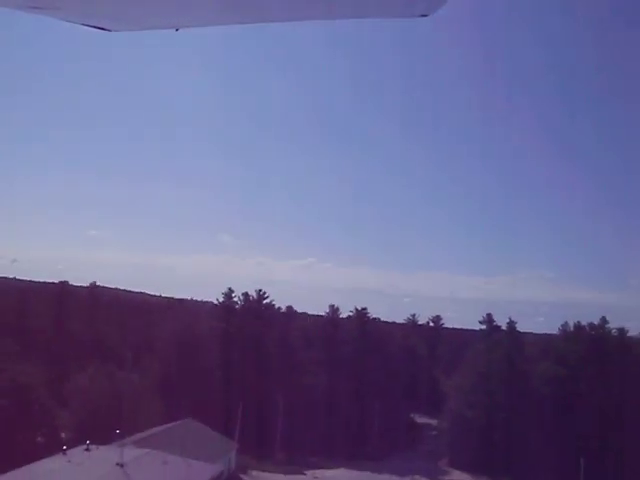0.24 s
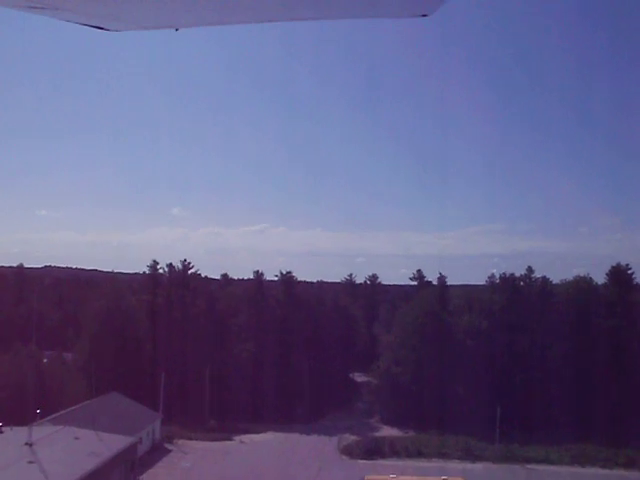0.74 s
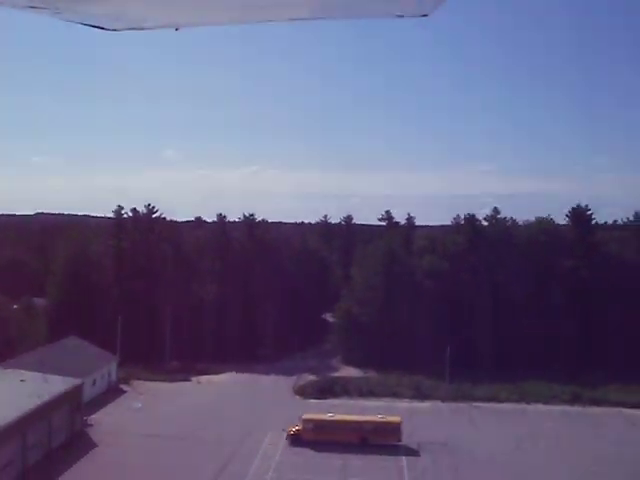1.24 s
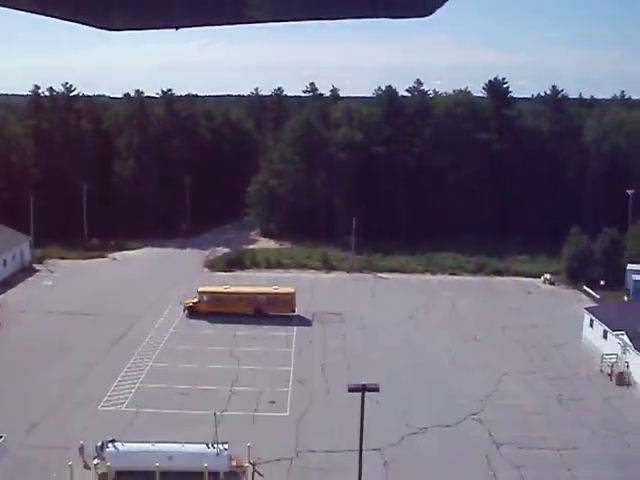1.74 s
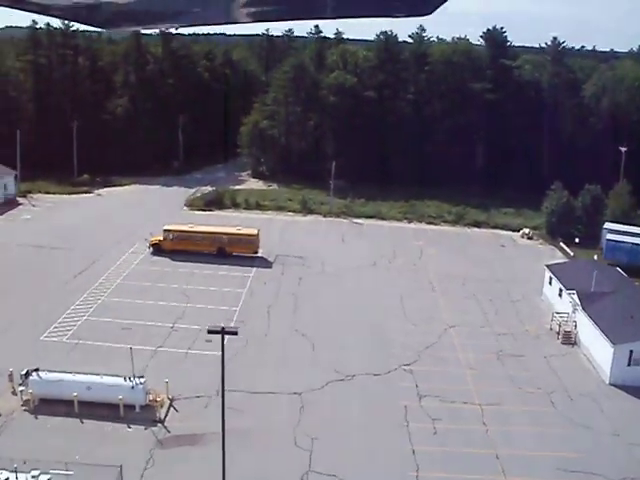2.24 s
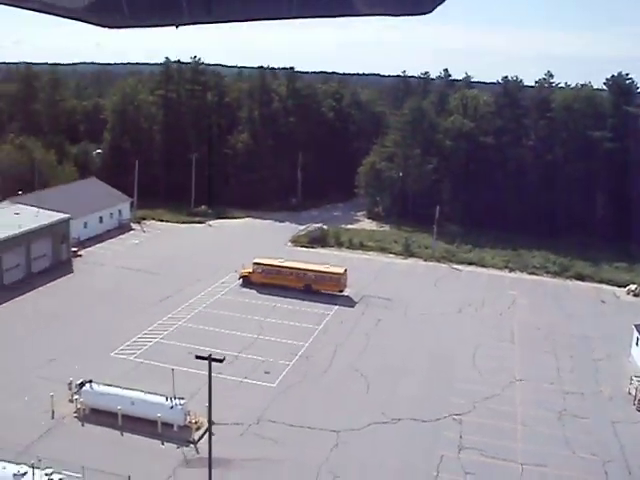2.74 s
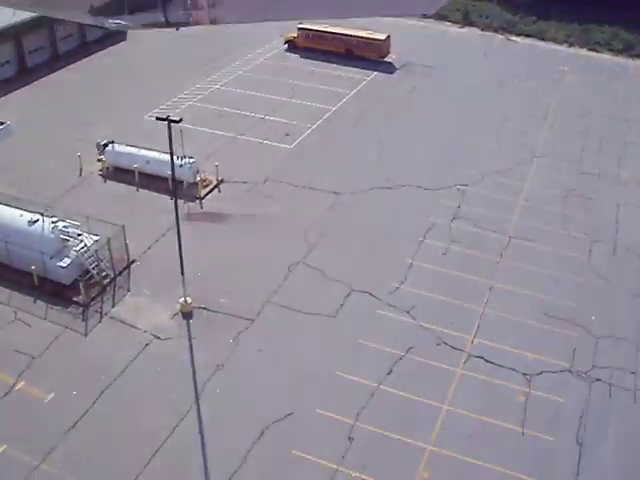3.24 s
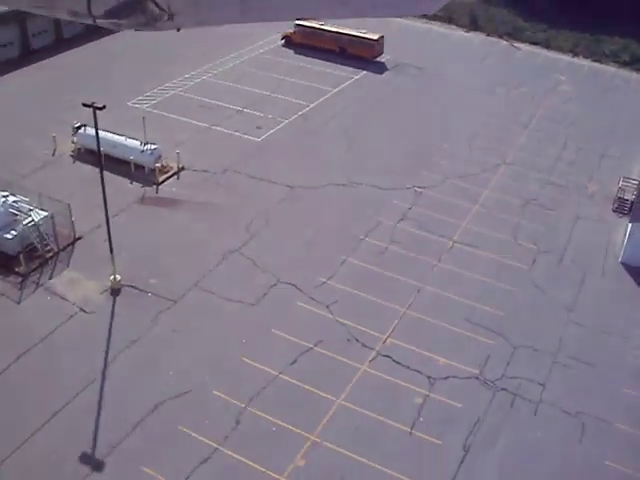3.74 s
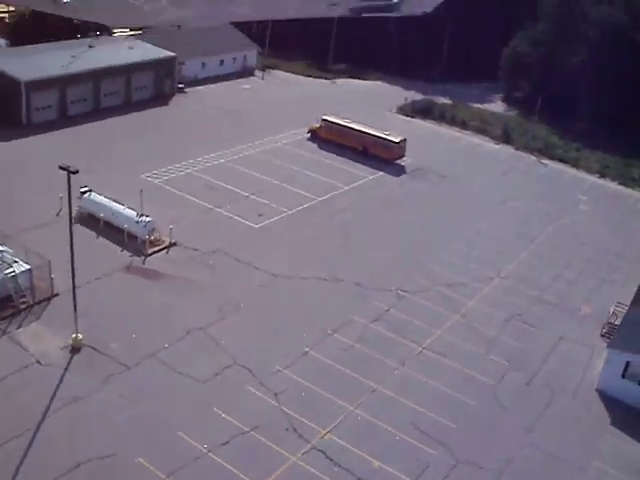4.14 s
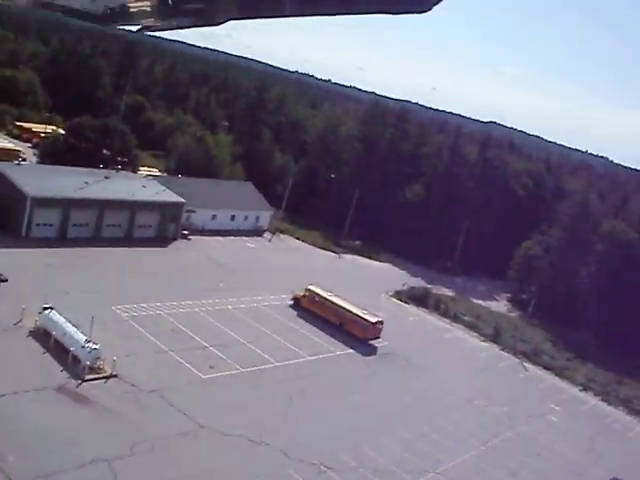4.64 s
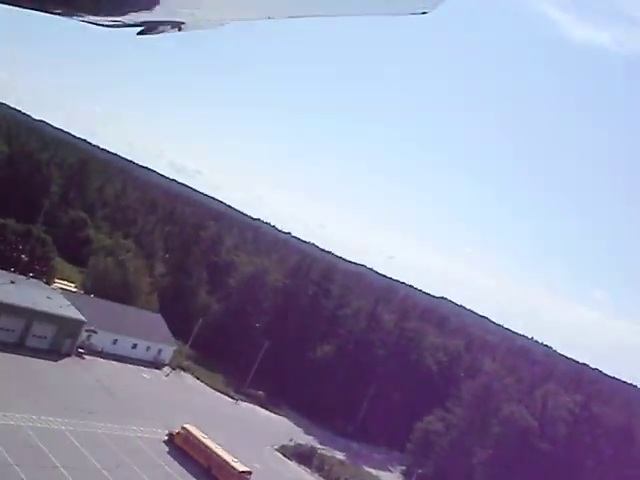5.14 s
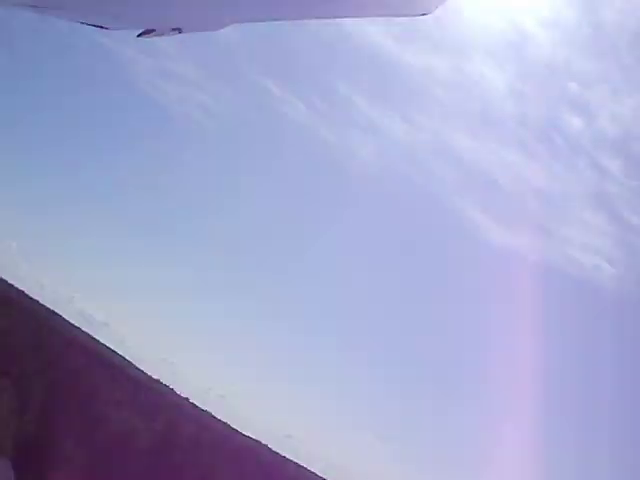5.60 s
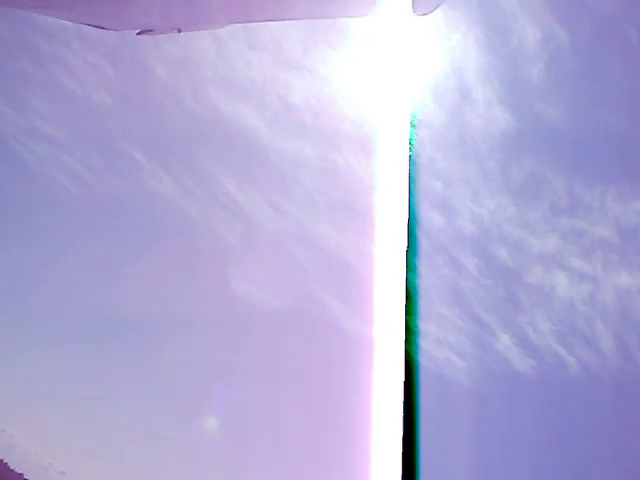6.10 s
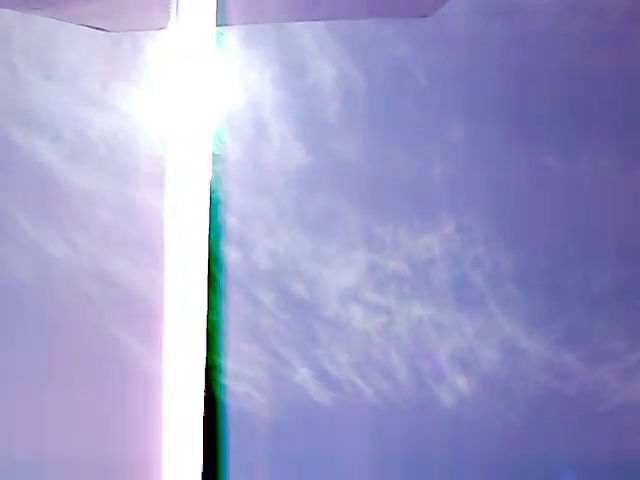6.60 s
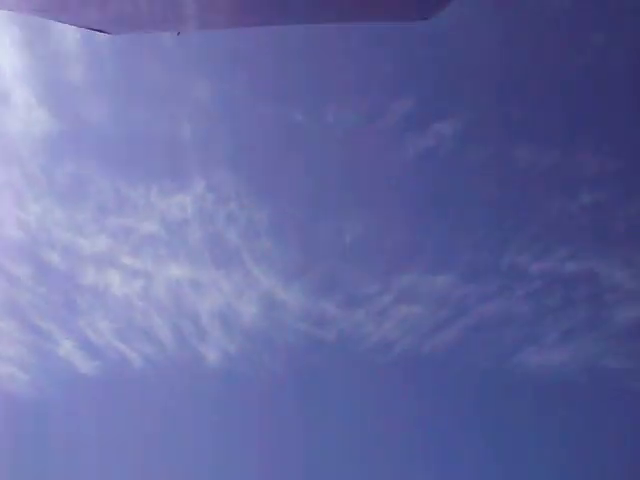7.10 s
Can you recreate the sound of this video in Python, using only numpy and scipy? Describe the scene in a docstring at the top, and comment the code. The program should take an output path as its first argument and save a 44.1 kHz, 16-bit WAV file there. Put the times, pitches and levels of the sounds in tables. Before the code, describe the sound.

Wind batters the small microphone from the first moment, overloading on gusts, while a high-revving little electric motor whines and buzzes at almost constant pitch. The airflow surges and slackens, strongest around the start of the banking climb. The whine's upper octave swells there, then pitch sags slightly, the motor tone changes and wash hiss rises. Dry, close, gritty and narrow.

```python
"""A small camera rides on an electric model glider that swoops over a car park and banks up into the sky.
From the start air noise thumps and rushes at the microphone, with short puffs, as the motor whines and the
propeller wash hisses. The air is strongest late in the dive and early in the bank, where the whine's octave swells.
Then the motor is eased back, its tones shift in balance, and the hiss rises and then stays strong to the end.
Air is shaped random noise, the motor is a sum of cosines, and the camera clips and keeps a narrow band."""
import sys
import numpy as np
from scipy import signal
from scipy.fft import rfft, irfft
from scipy.io import wavfile
from scipy.ndimage import uniform_filter1d

SR = 44100
rng = np.random.default_rng(int(sys.argv[2]) if len(sys.argv) > 2 else 0)


def dump(signal):
    """Clip the signal to [-1, 1] and save it as 16-bit WAV at the path in sys.argv[1]."""
    limited = np.clip(np.atleast_2d(signal).T, -1, 1)
    pcm = np.round(limited * 32767).astype(np.int16)
    wavfile.write(sys.argv[1], SR, pcm)


N = 324576
TIME_S = np.arange(N) / SR

# stages of the flight: (start, onset, hold, release), all in seconds
DIVE = (1.3, .7, 2.45, .65)
BANK = (4.2, 1.1, .5, .5)
THROTTLE_BACK = (5.95, .65, 1.0, .1)


def wind(airflow_db, eddies):
    """Large eddies thump on the microphone port, small ones rush round the camera case."""
    # gusts on the port: (time [s], swell of the rumble [dB], swell of the buffeting [dB])
    gusts = [(.18, 3.5, .5), (.74, 5.5, -1), (1.3, 3, 0), (1.75, 4, 0), (2.17, -1, 2.5), (2.45, 7, 1),
             (3.25, 2.5, 0), (3.72, 6, -1.5), (4.45, 4, 0), (5.13, 4.5, 0), (5.98, 2.5, .5), (6.55, 2, -1),
             (7.33, 3.5, 0)]
    # tone colours of the three air noises: (frequency [Hz], relative level [dB])
    rumble_colour = [(18, -14), (45, -5.5), (75, 1), (100, 0.5), (130, -6.5), (200, -21)]
    buffet_colour = [(80, -11), (125, -1), (170, 1.5), (240, -1), (400, -6.5), (650, -16.5), (1200, -29.5)]
    rush_colour = [(200, -11.5), (400, -2), (600, -3), (950, -6), (1400, -14), (2500, -20), (4000, -27.5)]
    gust_spread_s = .07
    eddy_db = 1.6

    # each pair: dB at zero airflow_db, then dB gained per dB of airflow
    rumble_db = air_level((-20, .3), airflow_db)
    buffet_db = air_level((-14.2, 1.1), airflow_db)
    rush_db = air_level((-23.5, .5), airflow_db)
    for moment_s, rumble_swell_db, buffet_swell_db in gusts:
        gust = swell(moment_s, gust_spread_s)
        rumble_db = rumble_db + rumble_swell_db * gust
        buffet_db = buffet_db + buffet_swell_db * gust

    # buffeting and rush share the same slower unevenness and the same quick eddies
    lumps_db = .7 * drift(9)
    buffet_db = buffet_db + lumps_db + .5 * eddy_db * eddies
    rush_db = rush_db + lumps_db + eddy_db * eddies
    rumble = from_db(rumble_db) * turbulence(rumble_colour, flutter_db=0.3, flutter_hz=6)
    buffet = from_db(buffet_db) * turbulence(buffet_colour, flutter_db=0.5, flutter_hz=30)
    rush = from_db(rush_db) * turbulence(rush_colour, flutter_db=1.5, flutter_hz=51)

    # the small eddies ride on the large ones
    large_eddies = rumble + buffet
    return large_eddies + rush * from_db(1.5 * rms_one(large_eddies))


def puffs(spread_s=0.0023):
    """Now and then an eddy bursts right on the port, short and bright."""
    # sharp puffs on the microphone port: (time [s], strength at the middle [dB])
    puff_moments = [(.153, -20), (.231, -16), (.372, -18), (.444, -18), (.548, -10), (.585, -14),
                    (.842, -17), (1.19, -19), (2.122, -16), (3.944, -15), (3.981, -15), (4.025, -13),
                    (4.492, -11), (4.758, -17), (5.068, -17), (5.521, -16), (5.863, -17), (6.109, -14),
                    (6.593, -19)]
    # tone colour of a puff: (frequency [Hz], relative level [dB])
    puff_colour = [(300, -3), (700, 0), (1500, -5), (3800, -11)]
    strength = sum(from_db(level_db) * swell(moment_s, spread_s) for moment_s, level_db in puff_moments)
    return strength * turbulence(puff_colour, flutter_db=2.5, flutter_hz=46)


def motor(turns, airflow_db):
    """The rotor runs off centre, so its tones bunch into short rising bursts, once per turn."""
    # motor and propeller tones before the swells below; 2 is the blade rate, 11-13 the whine:
    # (multiple of shaft speed, level at cruise [dB], level eased back [dB])
    tones = [(1, -28, -26), (2, -22, -28), (7, -42, -28), (10, -43, -42), (11, -32, -31), (12, -32, -42),
             (13, -25, -27), (14, -43, -48), (15, -46, -45), (16, -48, -44), (17, -42, -31.5),
             (18, -44, -55), (19, -42, -44), (20, -48, -50), (21, -45, -45), (22, -42, -48), (23, -41, -39),
             (24, -37, -45), (25, -40, -47), (26, -34, -39), (27, -36, -40), (28, -39, -36), (29, -47, -44),
             (30, -51, -43), (31, -50, -39), (32, -47, -44), (33, -44, -44), (34, -43, -43), (35, -45, -48),
             (36, -46, -47), (37, -45, -38), (38, -44, -45), (39, -48, -44), (40, -52, -54), (42, -43, -48)]
    # the tones gather round these multiples of the shaft speed; some lie on a cluster's lower flank
    clusters = (12, 25, 35)
    lower_flanks = (11, 12, 22, 23, 24, 25, 33, 34, 35)
    waver_db, wander_rad, sweep_rad = 1.6, .25, .2
    eased, bank = stage(THROTTLE_BACK), stage(BANK)

    # whine and buzz sink in fast air and swell under the load of the bank
    whine_db = -.9 - .5 * airflow_db + 2.8 * bank
    octave_db = -4.0 - .5 * airflow_db + 10.8 * bank
    buzz_db = -.3 - .3 * airflow_db + 1.3 * bank
    flank_db = 1.6 - 4.0 * stage(DIVE) - .4 * airflow_db
    # the blades beat and rasp harder in fast air
    beat_db = air_level((-.4, 1.1), airflow_db)
    rasp_db = air_level((0.2, .7), airflow_db)

    family_db = {}
    family_db.update(dict.fromkeys((1, 2), beat_db))
    family_db.update(dict.fromkeys((11, 12, 13), whine_db))
    family_db.update(dict.fromkeys(range(14, 21), rasp_db))
    family_db.update(dict.fromkeys(range(21, 40), buzz_db))
    family_db[26] = octave_db  # one octave above tone 13

    out = np.zeros(N)
    for multiple, cruise_db, eased_db in tones:
        # strong tones hold steadier, weak ones come and go
        looseness = np.interp(max(cruise_db, eased_db), [-38, -26], [1, .25])
        change_db = family_db.get(multiple, 0) + looseness * waver_db * drift(0.96)
        if multiple in lower_flanks:
            change_db = change_db + flank_db
        level = (1 - eased) * from_db(cruise_db) + eased * from_db(eased_db)
        level = level * from_db(change_db)
        # within each cluster the higher tones come later in the turn
        lag = sweep_rad * min(abs(multiple - centre) for centre in clusters) ** 2
        # the flexing airframe shifts each tone a little
        flex = looseness * wander_rad * drift(0.93)
        out += np.sqrt(2) * level * np.cos(2 * np.pi * multiple * turns - lag + flex)
    return out


def slipstream(turns, airflow_db, eddies, throb_db=0.4, eddy_db=0.23):
    """Propeller wash hisses, swelling once a turn and with each eddy."""
    # tone colour of the hiss: (frequency [Hz], relative level [dB])
    hiss_colour = [(700, -18), (1400, 1), (2000, 1), (2700, 0), (3400, -3), (3800, -1), (4000, -4.5)]
    # brief changes in the hiss: (time [s], level change [dB])
    hiss_lulls = [(.84, -4.2), (5.8, -2.8)]
    lull_spread_s = .17
    eased_rise_db = 3.5  # it hisses more with the throttle back
    lull_db = sum(change_db * swell(moment_s, lull_spread_s) for moment_s, change_db in hiss_lulls)
    hiss_db = air_level((-28.5, .45), airflow_db) + eased_rise_db * stage(THROTTLE_BACK) + lull_db
    swell_db = throb_db * np.cos(2 * np.pi * turns) + eddy_db * eddies
    return from_db(hiss_db + swell_db) * turbulence(hiss_colour, flutter_db=0.4, flutter_hz=4)


def turbulence(colour, flutter_db, flutter_hz):
    """Coloured air noise whose strength flutters as eddies pass."""
    hz, level_db = np.transpose(colour)
    bins_hz = np.maximum(np.fft.rfftfreq(N, 1 / SR), 1)
    # beyond both ends of the colour table the noise falls by 18 dB per octave
    octaves_below = np.maximum(np.log2(hz[0] / bins_hz), 0)
    octaves_above = np.maximum(np.log2(bins_hz / hz[-1]), 0)
    skirts_db = -18 * (octaves_below + octaves_above)
    shape = from_db(np.interp(np.log(bins_hz), np.log(hz), level_db) + skirts_db)
    noise = irfft(rfft(rng.standard_normal(N)) * shape, N)
    # a steady flow has a steady mean power
    mean_power = uniform_filter1d(noise ** 2, size=SR // 5)
    steady = noise / np.sqrt(mean_power)
    return rms_one(steady * from_db(flutter_db * drift(flutter_hz)))


def air_level(law, airflow_db):
    """Level in dB of a noise that grows with the airflow."""
    level_db, growth = law
    return level_db + growth * airflow_db


def stage(timing):
    """A stage of the flight comes on, holds and lets go: 0 to 1 and back."""
    start, onset, hold, release = timing
    corners_s = start + np.cumsum([0, onset, hold, release])
    return np.interp(TIME_S, corners_s, [0, 1, 1, 0])


def swell(moment_s, spread_s):
    """A bell curve of height 1 round a moment."""
    return np.exp(-.5 * ((TIME_S - moment_s) / spread_s) ** 2)


def drift(rate_hz):
    """Smoothed random wandering with a spread of 1; a higher rate wanders faster."""
    step = 100  # samples between the random points
    r = np.exp(-2 * np.pi * step * rate_hz / SR)
    points = rng.standard_normal(N // step + 2002)
    slow = signal.lfilter([1], [1, -2 * r, r * r], points)[2000:]  # drop the filter's run-in
    return np.interp(np.arange(N) / step, np.arange(len(slow)), rms_one(slow))


def in_time(rows):
    """Draw straight lines between the points of a curve, sample by sample."""
    seconds, values = np.transpose(rows)
    return np.interp(TIME_S, seconds, values)


def from_db(db):
    """Decibels to gain."""
    return 10 ** (np.asarray(db) / 20)


def rms_one(x):
    """Scale to an average strength (rms) of 1."""
    return x / np.sqrt(np.mean(x ** 2) + 1e-20)


def scene(motor_db=0.42):
    """Wind, propeller wash and motor, all close to the one microphone."""
    # motor speed: (time [s], speed [turns per s])
    shaft_curve = [(0.0, 92.01), (0.68, 92.47), (1.0, 92.2), (1.76, 93.44), (2.08, 92.69), (2.4, 92.4),
                   (2.8, 93.39), (3.2, 92.9), (3.64, 92.6), (4.48, 92.78), (5.0, 92.51), (5.12, 91.74),
                   (5.24, 90.37), (5.8, 89.62), (5.92, 89.94), (6.04, 91.1), (6.84, 90.98), (7.36, 91.29)]
    # strength of the airflow over the camera: (time [s], level [dB])
    airflow_curve = [(0.0, -0.8), (0.64, 0), (1.04, -3), (1.96, 0.5), (2.08, 2.5), (2.48, 2.5), (3.16, -3),
                     (3.52, 1.4), (3.8, 0), (3.96, 3.5), (5.0, 3), (5.24, 0.4), (5.76, 1.5), (6.36, -2.5),
                     (6.72, -1.7), (7.36, -2.1)]
    airflow_db = in_time(airflow_curve)
    # the speed wavers very slightly; adding it up counts the turns made so far
    speed = in_time(shaft_curve) * (1 + .0002 * drift(8))
    turns = np.cumsum(speed) / SR
    eddies = drift(35)
    air = wind(airflow_db, eddies) + puffs() + slipstream(turns, airflow_db, eddies)
    return (air + from_db(motor_db) * motor(turns, airflow_db))[None]


def record(dry):
    """Gusts overload the input; coarse sampling mirrors the top of the band; tall crests are shaved again."""
    camera_rate_hz, cutoff_hz = 8000, 15850
    loud = np.clip(dry, -.7, .7)
    # keep only what lies below half the camera's sampling rate
    narrow = signal.firwin(1601, camera_rate_hz / 2, fs=SR)
    band = signal.fftconvolve(loud, narrow[None], "same")
    # coarse sampling adds a mirror image; the gentle smoothing lets its lowest edge through
    mirrored = band * (1 + 2 * np.cos(2 * np.pi * camera_rate_hz * TIME_S))
    smoothing = signal.firwin(181, camera_rate_hz / 2, window=("kaiser", 9), fs=SR)
    smooth = signal.fftconvolve(mirrored, smoothing[None], "same")
    shaved = np.clip(smooth, -.71, .71)
    # a steep filter removes the highest treble
    steep = signal.ellip(10, .1, 70, cutoff_hz, fs=SR, output="sos")
    return signal.sosfilt(steep, shaved)


dry = scene()
out = record(dry)
dump(out)
```